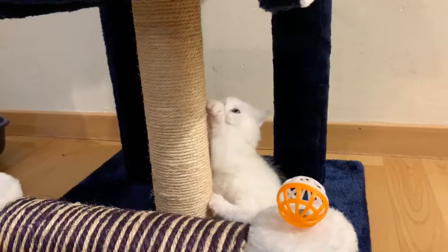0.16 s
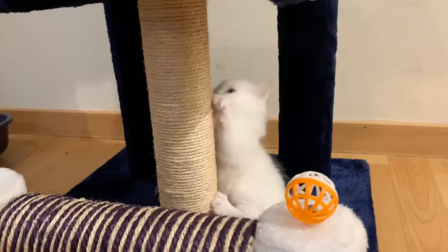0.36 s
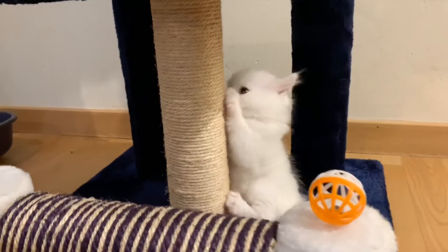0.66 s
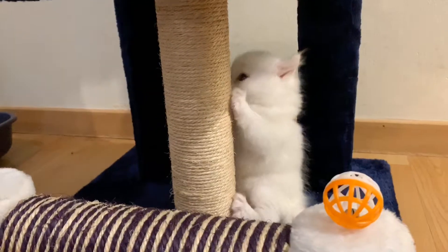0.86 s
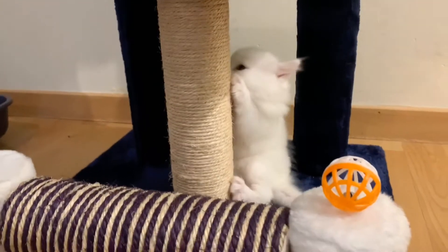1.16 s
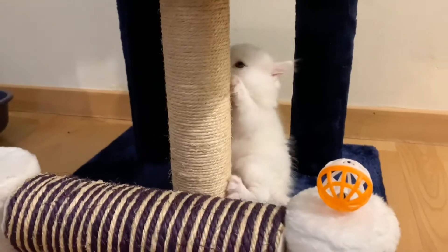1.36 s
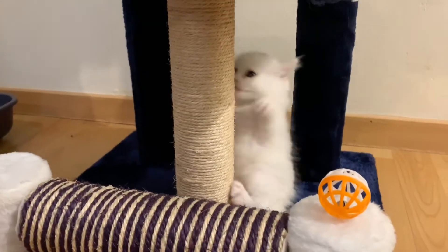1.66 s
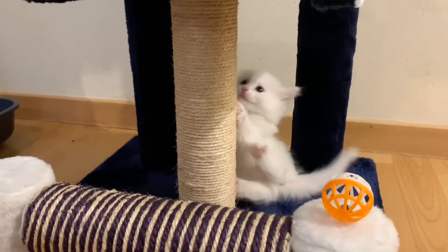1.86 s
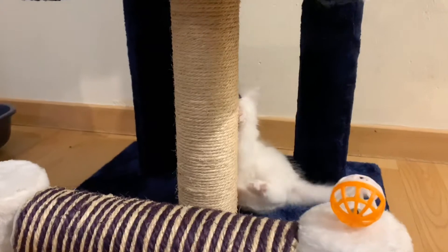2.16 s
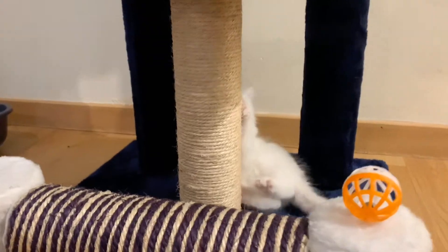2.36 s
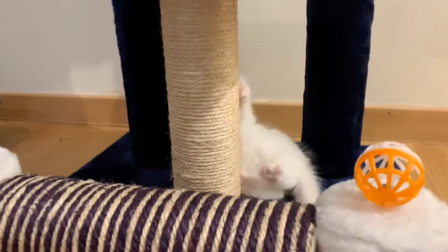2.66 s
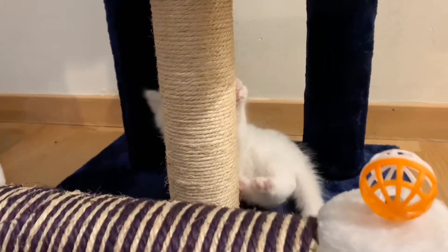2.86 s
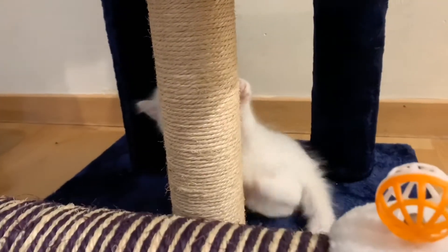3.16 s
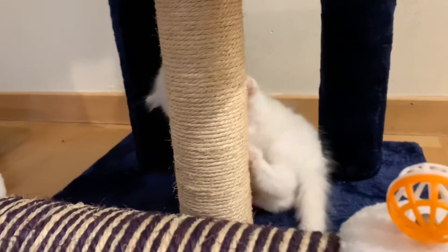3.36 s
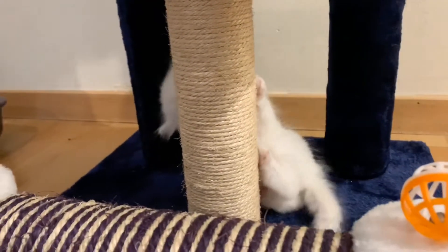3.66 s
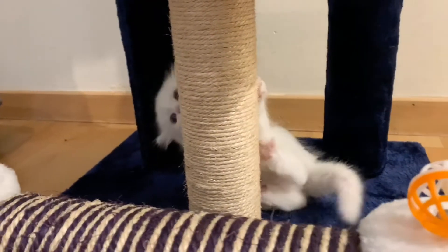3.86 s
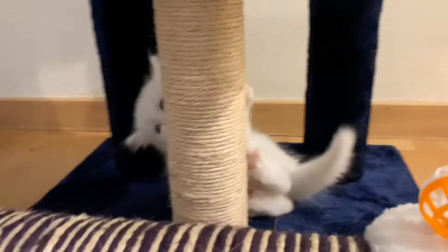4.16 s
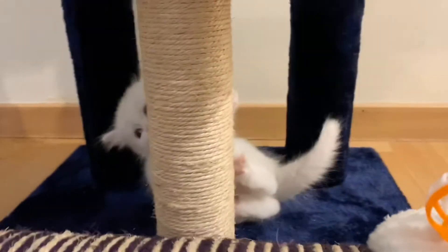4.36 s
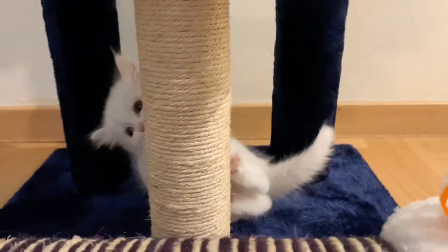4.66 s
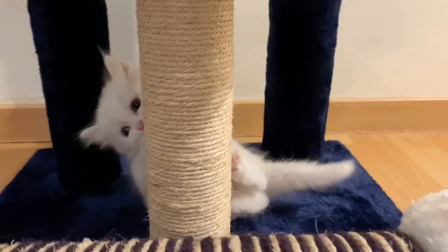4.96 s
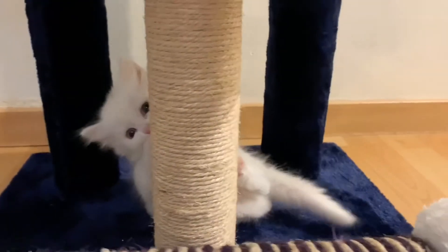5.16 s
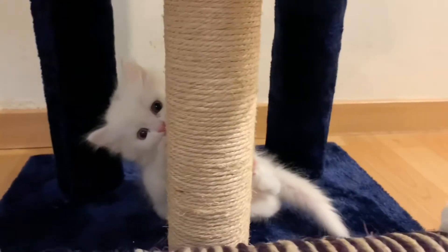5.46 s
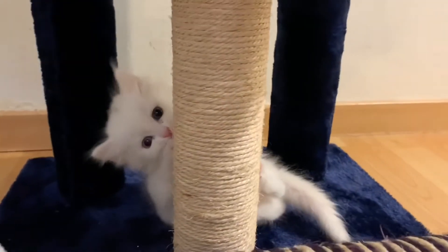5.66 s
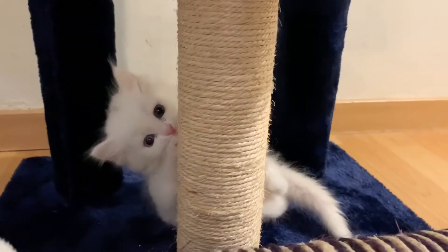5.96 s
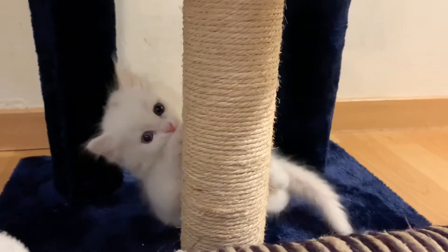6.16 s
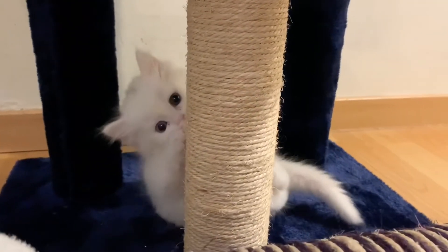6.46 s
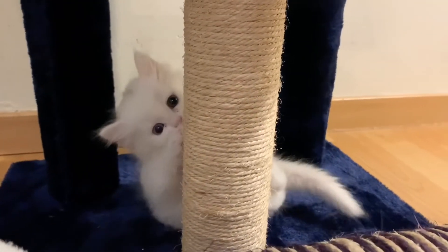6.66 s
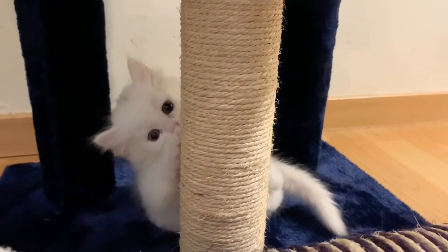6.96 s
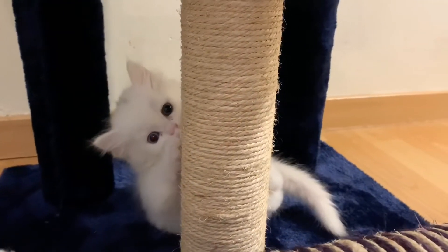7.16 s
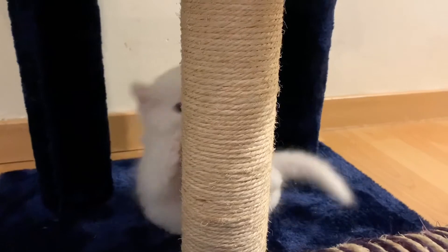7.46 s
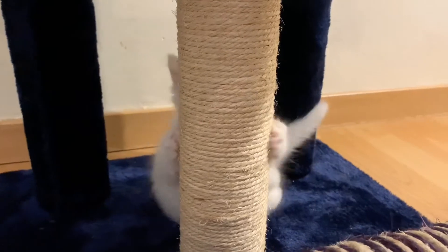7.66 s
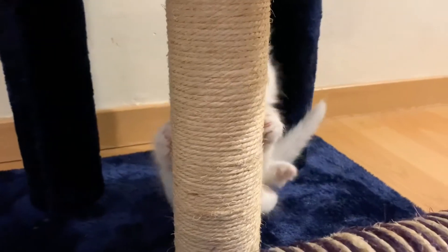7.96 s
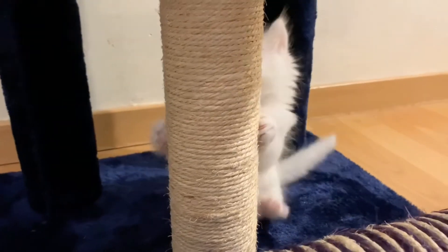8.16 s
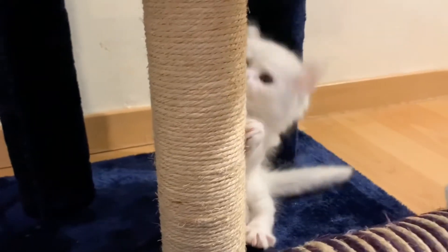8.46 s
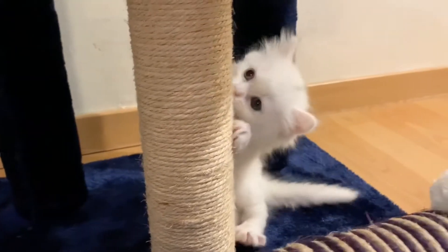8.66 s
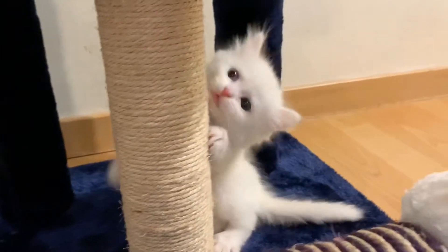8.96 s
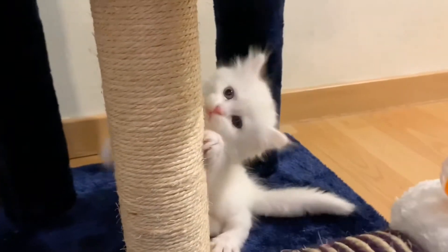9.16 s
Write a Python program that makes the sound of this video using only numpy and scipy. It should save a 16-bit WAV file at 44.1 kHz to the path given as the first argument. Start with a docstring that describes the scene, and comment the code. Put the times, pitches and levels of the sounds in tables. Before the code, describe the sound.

Throughout, a deep steady motor hum around 50 Hz, with wavering low tones, rumble and a soft rush of air, slightly stronger on the right. At 0 s a short rustle dies away. Faint fur brushing and tiny ticks come around 0.6 s. A short scrape leads to the strongest sharp claw snap and hollow woody knock at 1.07 s; more ticks and knocks follow at 1.26 and densely from 1.5 to 1.7 s. A pluck at 2.47 s, soft dull paw bumps at 2.7, 3.0 and 3.7 s, and rapid scratchy picking from 3.05 to 3.3 s, a plucky tick at 3.46. Sparse faint ticks around 4 to 5.1 s. A crisp crackling flurry at 5.9 to 6 s. Then near quiet, light picks and small scrapes from 7.4 to 8.3 s, and a faint brief squeak with scrapes and ticks at 8.5 to 8.7 s. Close, dry, small room.

```python
"""Kitten on a rope scratching post

A kitten climbs and hugs a rope scratching post close to a camera in a small room.
Claws snapping off fibres are short ringing modes and noise bursts; the hollow post answers with modes.
Drags and fur are random trains of coloured impulses, squeaks are jittery tones, paw bumps dull rings.
A hit's tail is dying away at the start, played as a rustle like the fur.
Beneath, wavering sines and rumble form a motor in the building, with a soft rush of air as noise."""
import sys
import numpy as np
from scipy import signal
from scipy.fft import rfft, irfft, next_fast_len
from scipy.io import wavfile
from scipy.ndimage import uniform_filter1d, map_coordinates

SR = 44100
rng = np.random.default_rng(int(sys.argv[2]) if len(sys.argv) > 2 else 0)


def int16_out(signal):
    """Quantize to a 16-bit WAV file."""
    q = np.round(np.clip(np.atleast_2d(signal).T, -1, 1) * 32767)
    wavfile.write(sys.argv[1], SR, q.astype(np.int16))


N = 410130  # samples


def amp(db):
    """Logarithmic level: decibels to amplitude gain."""
    return 10 ** (np.asarray(db) / 20)


def unit(x):
    """Normalisation: x scaled to rms 1."""
    return x / np.sqrt(np.mean(x ** 2) + 1e-20)


def along(points, hz):
    """Log-frequency interpolation: (frequency, value) points read at hz."""
    f, v = np.transpose(points)
    return np.interp(np.log(hz + 1), np.log(f + 1), v)


def wobble(rate):
    """Slow random modulation: a smooth curve through rate random knots a second."""
    knots = rng.standard_normal(int(N * rate / SR) + 4)
    return map_coordinates(knots, [np.arange(N) * rate / SR])


def filtered(x, response):
    """Linear filtering: the spectrum of x times a response of frequency."""
    n = x.shape[-1]
    m = next_fast_len(n + min(n, SR // 2))
    return irfft(rfft(x, m) * response(np.fft.rfftfreq(m, 1 / SR)), m)[..., :n]


def coloured(x, spectrum):
    """Spectral shaping: x filtered by a dB curve, at rms 1."""
    return unit(filtered(x, lambda hz: amp(along(spectrum, hz))))


def add(track, s, sound):
    """Superposition: mix a sound into a track at time s."""
    part = track[max(round(s * SR), 0):][:len(sound)]
    part += sound[:len(part)]


def ring(t, hz, t60):
    """Damped resonance: one mode falling 60 dB in t60 seconds."""
    return np.sin(2 * np.pi * hz * t) * amp(-60 * t / t60)


def struck(t, modes):
    """Modal superposition: all modes rung at once, their levels varied each time, at rms 1."""
    total = np.zeros(len(t))
    for k, (hz, db, t60) in enumerate(modes):
        total += (-1) ** k * amp(db + rng.normal(0, 1.9)) * ring(t, hz, t60)
    return unit(total)


def burst(t, fade_s):
    """Broadband transient: fading noise that holds all pitches about equally."""
    fade = amp(-30 * t / fade_s)
    z = rfft(rng.standard_normal(len(t)) * fade ** 2)
    flat = irfft(z / (np.abs(z) + 1e-12), len(t))
    return unit(flat * fade)


def grains(n, rate, spread_db):
    """Random impulse process: fibres let go at random moments, with very uneven size."""
    chance, size = rng.random(n), rng.standard_normal(n)
    return (chance < rate / SR) * amp(spread_db * size) * rng.choice([-1, 1], n)


def patchy(x, depth_db):
    """Time-frequency modulation: x with a gain that drifts at random over pitch and time."""
    z = signal.stft(x, nperseg=512)[2]
    field = rng.standard_normal(z.shape[-2:])
    field = uniform_filter1d(uniform_filter1d(field, size=7, axis=0), size=18, axis=1)
    return signal.istft(z * amp(depth_db * unit(field)), nperseg=512)[1][..., :N]


# likeness of left and right room noise: frequency_hz, correlation (0-1)
PORT_LIKENESS = [(120, 1), (250, 0.71), (400, 0.38), (900, 0.47), (1300, 0.1), (1800, 0.56), (2500, 0.43),
                 (4000, 0.076), (6400, 0.66), (8000, 0.15)]


def diffuse(spectrum):
    """Diffuse-field coherence: uneasy stereo noise whose ports agree by a share set per frequency."""
    pair = patchy(rng.standard_normal((2, N)), depth_db=1.2)

    def mid_side(hz):
        # the angle splits power into common and opposed parts
        turn = np.arccos(np.clip(along(PORT_LIKENESS, hz), -1, 1)) / 2
        return amp(along(spectrum, hz)) * [np.cos(turn), np.sin(turn)]

    mid, side = filtered(pair, mid_side)
    return unit(np.array([mid + side, mid - side]))


# steady tones of the motor and of what it shakes:
# pitch_hz, level_db (rms before the hum gains), waver (rad of phase; half as much in amplitude)
MOTOR_TONES = [(48.78, -31, 0.019), (62.8, -54, 0.21), (74.94, -49.5, 0.062), (96.14, -45.5, 0.38),
               (105.6, -42.5, 0.55), (131.5, -54, 0.67), (145.1, -53, 0.68), (193, -48.5, 0.69),
               (242.5, -60.5, 0.55), (251, -67, 0.89), (285.9, -63.5, 0.99), (295.5, -65, 0.088),
               (341.3, -66, 1), (403.3, -72, 0.089), (584, -77, 0.093)]
# low room noise: frequency_hz, relative level_db (per Hz)
RUMBLE_SPECTRUM = [(15, -27), (30, -15), (39, -2.5), (60, -5), (92, -1), (125, -9.5), (175, -11),
                   (215, -12.5), (270, -21.5), (320, -20.5), (400, -24.5), (500, -32.5), (900, -83)]


def motor(hum_db=-0.25, rumble_db=-39.5, right_db=2.0, rumble_right_db=-0.3):
    """Forced vibration: a firm shaft tone and wavering lines, stronger on the right, over a rumble."""
    t = np.arange(N) / SR
    hum = np.zeros(N)
    for hz, db, waver in MOTOR_TONES:
        phase = 2 * np.pi * (hz * t + rng.random()) + waver * wobble(4)
        swell = 1 + waver / 2 * wobble(5)
        hum += amp(db) * unit(np.sin(phase) * swell)
    hum_gains = amp([[hum_db - right_db], [hum_db + right_db]])
    rumble_gains = amp([[rumble_db - rumble_right_db], [rumble_db + rumble_right_db]])
    return hum * hum_gains + diffuse(RUMBLE_SPECTRUM) * rumble_gains


# rush of air: frequency_hz, relative level_db (per Hz)
AIR_SPECTRUM = [(250, -28), (490, -5.5), (620, 2), (900, 0.5), (1200, -5), (1450, -4.5), (1800, -6.5),
                (2100, -8), (3200, -16), (4400, -17.5), (6300, -26.5), (7800, -40.5), (12000, -42.5),
                (14200, -35), (15000, -50)]
# thin high hiss: frequency_hz, relative level_db (per Hz)
HISS_SPECTRUM = [(6500, -29), (7600, -9), (8300, 7), (9000, 1.5), (10000, -7), (11200, -13), (13000, -55)]
AIR_LEAD = 14  # samples by which the rush reaches the left port first


def air(air_db=-54.5, hiss_db=-72.5):
    """Broadband flow noise: a steady rush reaching the left first, and a high hiss on the right."""
    rush = amp(air_db) * diffuse(AIR_SPECTRUM)
    hiss = amp(hiss_db) * coloured(rng.standard_normal(N), HISS_SPECTRUM)
    rush[1] = np.roll(rush[1], AIR_LEAD) + hiss
    return rush


# the kitten shifts its hold and its fur brushes the rope; the first row is instead a hit's tail,
# dying away at the start and played here as a rustle:
# start_s, end_s (of the full level), level_db (before the fur gain)
RUSTLES = [(0.0, -0.025, -46.5), (0.22, 0.362, -69), (0.52, 0.697, -63.5), (0.978, 1.682, -65),
           (2.0, 2.4, -70.5), (2.514, 2.66, -64), (2.75, 3.35, -67), (5.13, 5.42, -71),
           (5.692, 5.997, -64.5), (6.05, 6.295, -70.5), (6.77, 6.83, -69.5), (7.04, 7.12, -74),
           (7.36, 7.9, -72), (8.05, 8.31, -69.5), (8.57, 8.687, -66.5), (8.84, 8.892, -67.5)]
# fur on rope: frequency_hz, relative level_db (per Hz)
FUR_SPECTRUM = [(800, -12), (2500, 1), (4500, -1), (7500, -5), (9000, -2), (10500, -5), (12000, -13),
                (14000, -13), (15000, -26), (16000, -34)]
# a fibre's tick, also in drags and releases: frequency_hz, relative level_db (per Hz)
TICK_SPECTRUM = [(1500, -20), (4500, -9), (6300, -3), (7500, -4), (8500, -1), (10200, 0), (11500, -5),
                 (13500, -6), (15000, -9), (16500, -20)]
RUSTLE_ATTACK_S, RUSTLE_RELEASE_S = 0.11, 0.087  # linear swell before and decay after the hold
CLING_DB = -74  # faint rustle of just clinging to the post, before the fur gain


def fur(gain_db=-2, snag_db=-20):
    """Sliding friction: hairs rustle as dense fine impulses; now and then a stray fibre ticks."""
    t = np.arange(N) / SR
    sliding = np.full(N, amp(CLING_DB))
    for start, end, db in RUSTLES:
        attack = 1 + (t - start) / RUSTLE_ATTACK_S
        release = 1 + (end - t) / RUSTLE_RELEASE_S
        swell = np.clip(np.minimum(attack, release), 0, 1)
        sliding = np.maximum(sliding, amp(db) * swell)
    hairs = coloured(grains(N, rate=5000, spread_db=4), FUR_SPECTRUM)
    snags = coloured(grains(N, rate=9, spread_db=3), TICK_SPECTRUM)
    return amp(gain_db + wobble(25)) * sliding * (hairs + amp(snag_db) * snags)


# a claw snaps off a fibre, levels before the shared gains: start_s, tick_level_db, tick_pitch_hz,
# pluck_level_db, fibre_pitch_hz (once slackened), knock_level_db (on the post)
CLAW_RELEASES = [(0.603, -62, 13400, -60, 4500, -70), (0.651, -63, 13400, -64, 4500, -68),
                 (1.068, -40, 10000, -49, 6100, -39.5), (1.258, -59, 11000, -56, 4540, -65),
                 (1.5078, -49, 9600, -65, 6200, -45.5), (1.5125, -65, 8500, -72, 2400, -42.5),
                 (1.5175, -59, 12000, -59, 4460, -48), (1.5257, -54, 14000, -60, 4460, -55),
                 (1.551, -53, 12000, -66, 6400, -73), (1.563, -58, 12600, -68, 6400, -72),
                 (1.6358, -52.5, 11200, -64, 4440, -54), (1.6864, -66, 6500, -60, 2410, -54),
                 (2.4742, -52.5, 6500, -47.5, 2630, -50), (2.865, -61, 11000, -65, 4310, -67),
                 (3.058, -62, 13000, -57, 2460, -63), (3.0649, -57, 10500, -57.5, 2550, -54),
                 (3.1202, -62, 6500, -62, 3920, -62), (3.131, -61, 12500, -65, 3600, -61),
                 (3.173, -57.5, 12500, -59, 4700, -59), (3.2112, -64, 12500, -57, 6300, -62),
                 (3.233, -66, 10500, -61, 2510, -72), (3.274, -61, 7000, -62, 2670, -71),
                 (3.299, -62, 12000, -58.5, 4200, -66), (3.310, -59, 10500, -68, 4370, -72),
                 (3.463, -66, 6300, -45.5, 3300, -62), (4.0316, -71, 10500, -57, 2960, -72),
                 (4.1344, -71, 10000, -67, 2500, -74), (5.094, -67, 9000, -62, 2400, -65),
                 (5.903, -52, 9050, -70, 3100, -70), (5.9274, -52, 8200, -54, 2600, -56),
                 (5.9296, -55, 8600, -54.5, 4400, -61), (5.942, -55, 10900, -53.5, 4200, -50),
                 (5.955, -63, 12000, -53.5, 4360, -59), (5.961, -62, 9000, -69, 5800, -66),
                 (5.985, -64, 9500, -63, 4370, -68), (5.992, -60, 11900, -57, 4400, -58),
                 (6.4408, -68, 7500, -69, 2400, -76), (7.417, -54.5, 8560, -50.5, 4340, -60),
                 (7.5338, -68, 10000, -63, 4400, -66), (7.633, -58.5, 7500, -55.5, 3200, -70),
                 (7.763, -63.5, 11500, -74, 6460, -74), (7.772, -62, 7500, -71, 6460, -74),
                 (7.787, -56, 9100, -59, 4800, -71), (8.0531, -54.5, 10500, -55, 3400, -61),
                 (8.12, -71, 11000, -58, 4000, -71), (8.172, -70, 12000, -74, 4650, -76),
                 (8.197, -60, 8500, -71, 4650, -68), (8.29, -66, 9000, -66, 2470, -76),
                 (8.527, -60.5, 7060, -62, 6230, -58), (8.658, -57.5, 7450, -66, 5000, -71)]
# tip of a claw as it lets go: pitch_hz, relative level_db, t60_s
CLAW_TIP_MODES = [(4580, -26, 0.0048), (5600, 7, 0.0066), (8560, 6, 0.0044), (9900, -8, 0.0073),
                  (13500, -14, .002)]
# rattle of rope fibres, also in drags: frequency_hz, relative level_db (per Hz)
RASP_SPECTRUM = [(300, -5), (800, 1.5), (1400, 3.5), (1900, -2), (2550, 5), (3200, -4), (3750, -6.5),
                 (4400, 1.5), (5200, -13.5), (6300, -11), (9000, -22), (15000, -36)]
SNAP_T60, FIBRE_T60 = 0.0012, .01  # s: the first few cycles of a release, and the twang
TICK_FADE_S, FRAY_FADE_S = .005, .03  # burst fades: the snap, and the rattle of loose fibres
FIBRE_SLACK, SLACKEN_S = .05, .003  # initial sharpness (share of pitch), and how soon it settles


def claws(fray_db=-12, tip_db=-6, twang_db=-1, rasp_db=0, gain_db=-9):
    """Sudden release of tension: each is a sharp tick with a frayed tail and a plucked fibre."""
    track, t = np.zeros(N), np.arange(SR // 12) / SR
    for s, tick_db, tick_hz, pluck_db, hz, _ in CLAW_RELEASES:
        # a firm snap is clean, a weak one frays out
        frayed_db = fray_db - .4 * (tick_db + 52)
        snap = unit(ring(t, tick_hz, SNAP_T60)) + amp(tip_db) * struck(t, CLAW_TIP_MODES)
        click = coloured(burst(t, TICK_FADE_S), TICK_SPECTRUM)
        fray = coloured(burst(t, FRAY_FADE_S), TICK_SPECTRUM)
        tick = unit(snap + click + amp(frayed_db) * fray)
        # a strand sags in pitch as it slackens, while its neighbours rattle
        sagging = t + FIBRE_SLACK * SLACKEN_S * (1 - np.exp(-t / SLACKEN_S))
        twang = unit(ring(sagging, hz, FIBRE_T60))
        rattle = coloured(burst(t, FRAY_FADE_S), RASP_SPECTRUM)
        pluck = unit(amp(twang_db) * twang + amp(rasp_db) * rattle)
        add(track, s, amp(tick_db) * tick + amp(pluck_db) * pluck)
    return amp(gain_db) * track


# the hollow post: pitch_hz, relative level_db, t60_s
POST_MODES = [(446, -4, 0.045), (541, -5.5, 0.062), (790, -7, 0.025), (965, -0.5, 0.042),
              (1270, -3.5, 0.053), (1720, -5, 0.03), (2207, -15, .025), (2420, -10, 0.053)]
# dry slap of rope on the tube: frequency_hz, relative level_db (per Hz)
CRACK_SPECTRUM = [(300, -4), (600, 7.5), (1000, 5), (2300, 3.5), (3300, -8.5), (4600, -3.5), (5300, -10),
                  (6400, -8), (7500, -14), (11000, -24)]
CRACK_FADE_S = 0.016  # burst fade


def post(gain_db=-13.5, crack_db=1):
    """Impact excitation of modes: each release slaps rope on the tube, a dry crack and a brief ring."""
    track, t = np.zeros(N), np.arange(SR // 12) / SR
    for s, *_, knock_db in CLAW_RELEASES:
        crack = coloured(burst(t, CRACK_FADE_S), CRACK_SPECTRUM)
        knock = struck(t, POST_MODES) + amp(crack_db) * crack
        add(track, s, amp(gain_db + knock_db) * knock)
    return track


# a claw drags over the windings: start_s, end_s, level_db (before the layer mix)
CLAW_DRAGS = [(0.99, 1.067, -60.5), (1.235, 1.266, -63), (1.496, 1.543, -68), (1.572, 1.604, -63),
              (1.681, 1.716, -64), (2.482, 2.493, -60), (3.054, 3.125, -67), (3.11, 3.15, -60),
              (3.161, 3.2, -65), (3.204, 3.251, -65), (3.282, 3.336, -68), (4.022, 4.059, -66.5),
              (5.914, 5.92, -60), (5.933, 6.003, -61), (7.396, 7.44, -63), (7.516, 7.585, -65),
              (8.471, 8.577, -71), (8.641, 8.694, -66)]


def scrapes(crackle_db=-3.5, rasp_db=0.0, ease_db=4):
    """Granular friction: a claw tears many fine fibres in a stroke that bites fast and eases off."""
    track = np.zeros(N)
    for start, end, db in CLAW_DRAGS:
        u = np.linspace(0, 1, max(round((end - start) * SR), SR // 100))
        stroke = unit(np.sqrt(np.abs(np.sin(np.pi * u))) * amp(-ease_db * u))
        slips = grains(len(u), rate=1100, spread_db=6.5)
        crackle = amp(crackle_db) * coloured(slips, TICK_SPECTRUM)
        rasp = amp(rasp_db) * coloured(slips, RASP_SPECTRUM)
        add(track, start, amp(db) * stroke * (crackle + rasp))
    return track


# soft paws bump the platform: start_s, pitch_hz, level_db (peak scale before onset and decay)
PAW_BUMPS = [(2.672, 347, -41), (2.69, 138, -30), (2.98, 145, -37), (3.058, 590, -41), (3.18, 464, -45),
             (3.66, 140, -37), (3.942, 587, -42.5)]


def paws(ring_cycles=36):
    """Cushioned impact: a slow start and one dull ring, the longer the deeper it is."""
    track, t = np.zeros(N), np.arange(SR // 3) / SR
    for s, hz, db in PAW_BUMPS:
        onset = 1 - np.exp(-t * hz)
        add(track, s, amp(db) * onset * ring(t, hz, ring_cycles / hz))
    return track


# a claw tip squeaks along a taut fibre:
# start_s, end_s, pitch_hz, level_db (before the room), jitter (share of pitch)
CLAW_SQUEAKS = [(6.765, 6.825, 6400, -75, .06), (8.466, 8.497, 2775, -60, .03),
                (8.533, 8.565, 2780, -70, 0)]


def squeaks():
    """Stick-slip friction: uneven slipping sings for a moment as a tone, hoarse where jittered."""
    track = np.zeros(N)
    for start, end, hz, db, jitter in CLAW_SQUEAKS:
        n = max(round((end - start) * SR), SR // 100)
        pitch = hz * (1 + jitter * wobble(2200)[:n])
        phase = 2 * np.pi * np.cumsum(pitch) / SR
        add(track, start, amp(db) * unit(np.sin(phase) * signal.windows.tukey(n)))
    return track


# decay of the walls' tail: frequency_hz, t60_s
WALL_DECAY = [(200, 0.36), (2000, 0.14), (8000, 0.16), (15000, 0.02)]


def room(x, tail_db=-14):
    """Early reflection and reverberation: floor and platform after 0.5 ms, walls with a short tail."""
    n = SR // 3
    noise = rng.standard_normal((2, n))
    hz, t, z = signal.stft(noise, SR, nperseg=256)
    decay = amp(-60 * t / along(WALL_DECAY, hz)[:, None])
    tail = signal.istft(z * decay, SR, nperseg=256)[1][:, :n]
    early = np.array([burst(np.arange(n) / SR, .022) for port in range(2)])
    early *= amp(-8) / np.linalg.norm(early[0])
    answer = early + amp(tail_db) * tail / np.linalg.norm(tail[0])
    delayed = np.pad(x, (SR // 2000, 0))
    return signal.fftconvolve(delayed[None], answer, axes=1)[:, :N]


def moving_room(x):
    """Time-varying reflection: kitten and camera keep moving, so each stretch meets a new response."""
    hop = SR // 4  # four sets of reflections a second
    wet = np.zeros((2, N))
    for start in range(0, N, hop):
        for port, answer in zip(wet, room(x[start:start + hop])):
            add(port, start / SR, answer)
    return wet


# the mids travel mostly by way of floor and platform, the treble mostly straight:
# frequency_hz, reflected power share (0-1, before the scene gains)
REFLECTED_SHARE = [(600, 0.54), (1700, 0.68), (4000, 0.7), (7000, 0.63), (10000, 0.34)]
PORT_LAG = 13  # samples by which the right port leads


def scene(direct_db=2.45, reflected_db=8.5):
    """Direct and reverberant fields: the kitten leads on the right; its reflections are unrelated."""
    # rubbing changes colour as the contact moves from one winding to the next
    rubbing = patchy(scrapes() + fur(), depth_db=1.2)
    kitten = claws() + post() + rubbing + squeaks()

    def split(hz):
        share = np.clip(along(REFLECTED_SHARE, hz), 0, 1)
        return np.sqrt([1 - share, share])

    straight, scattered = filtered(kitten, split)
    direct = np.array([np.pad(straight, (PORT_LAG, 0))[:N], straight])
    near = amp(direct_db) * direct + amp(reflected_db) * moving_room(scattered)
    return near + paws() + motor() + air()


# treble colour of the microphone: frequency_hz, gain_db
MIC_RESPONSE = [(8000, 0), (10100, 0), (11200, -2), (12000, -6), (13300, 1), (14500, -6), (16000, -5)]
TOP_HZ = 16300  # band limit


def record(dry):
    """Transducer response: the camera colours the treble and keeps nothing above its band limit."""
    faded = dry * signal.windows.tukey(N, .001)  # very short fades at both ends
    return filtered(faded, lambda hz: amp(along(MIC_RESPONSE, hz)) * (hz < TOP_HZ))


dry = scene()
out = record(dry)
int16_out(out)
```